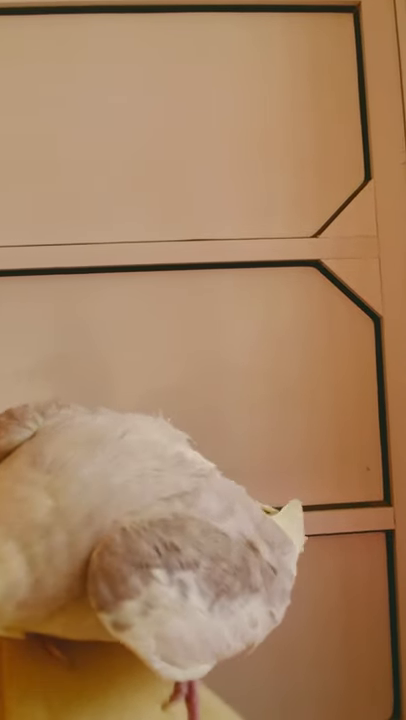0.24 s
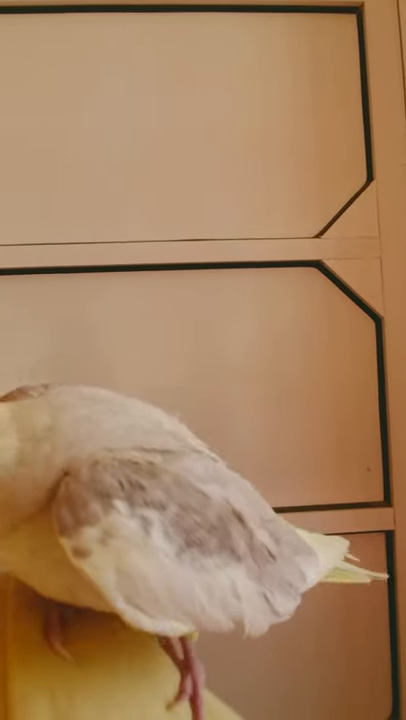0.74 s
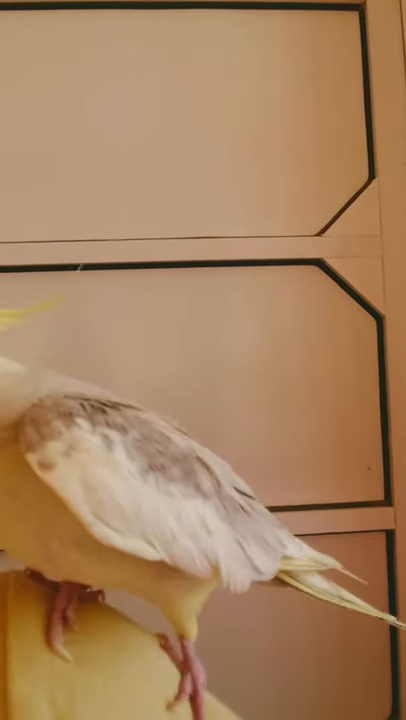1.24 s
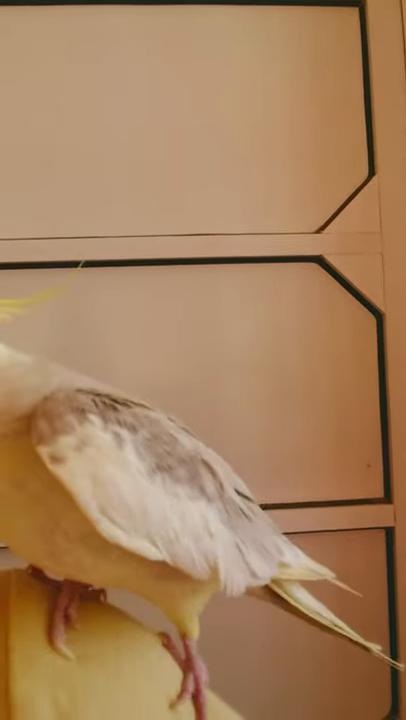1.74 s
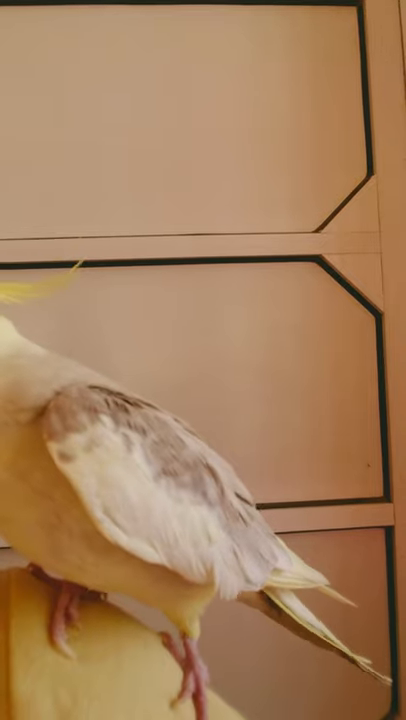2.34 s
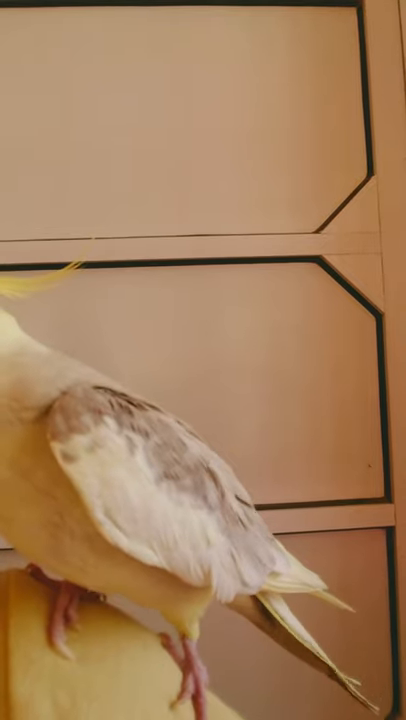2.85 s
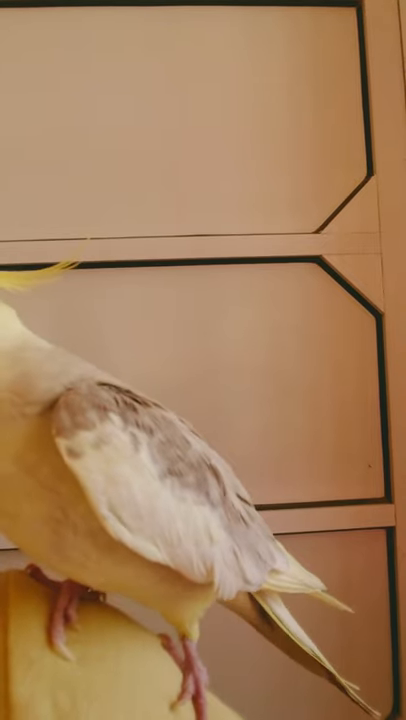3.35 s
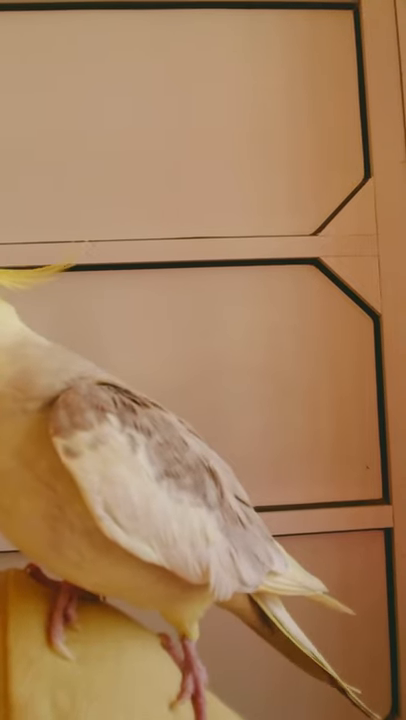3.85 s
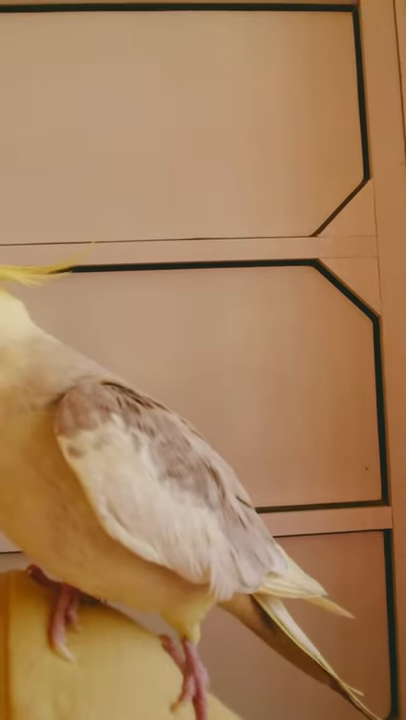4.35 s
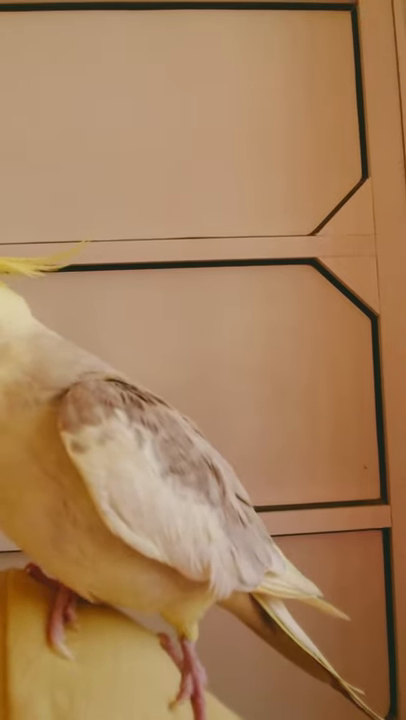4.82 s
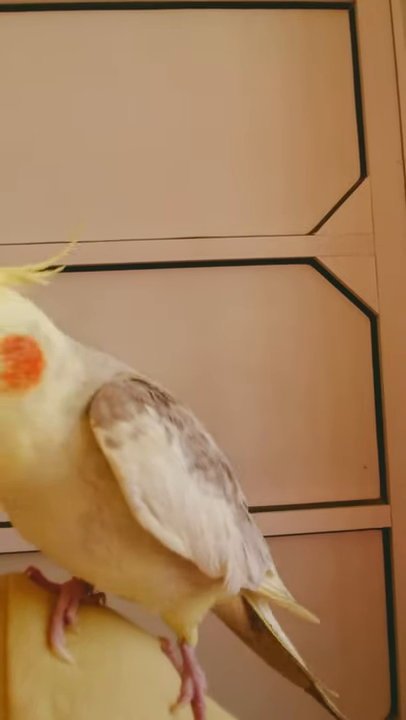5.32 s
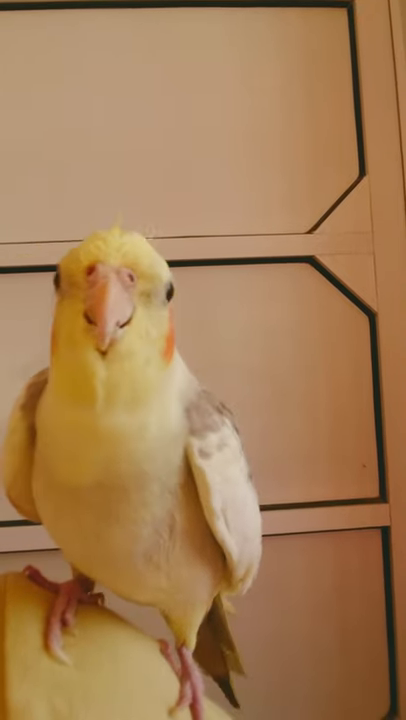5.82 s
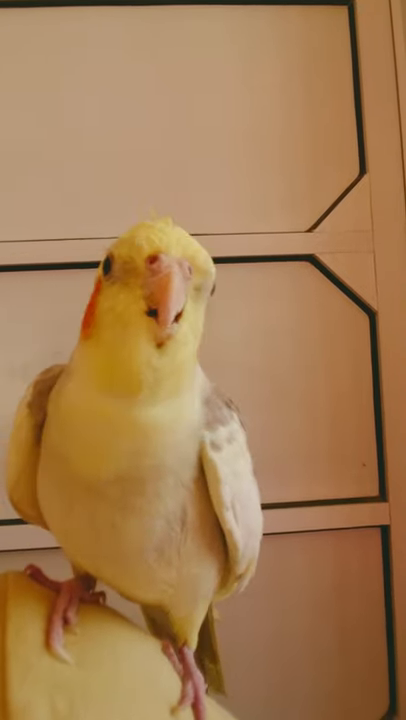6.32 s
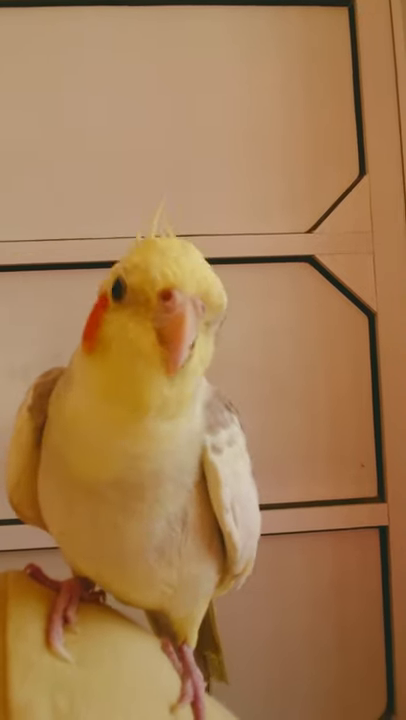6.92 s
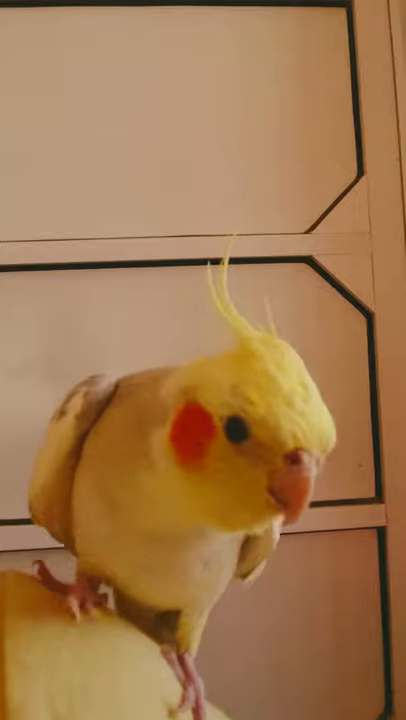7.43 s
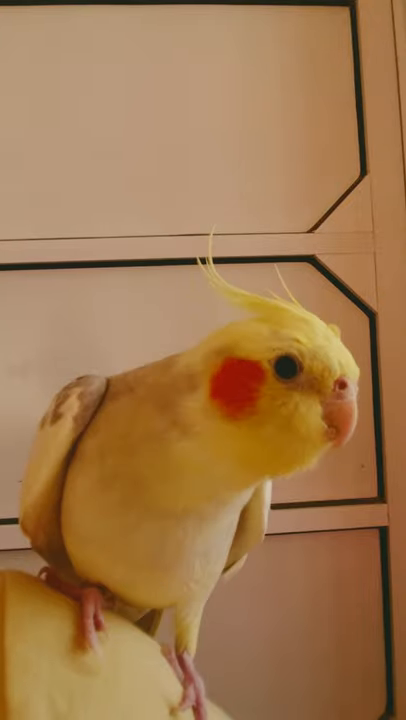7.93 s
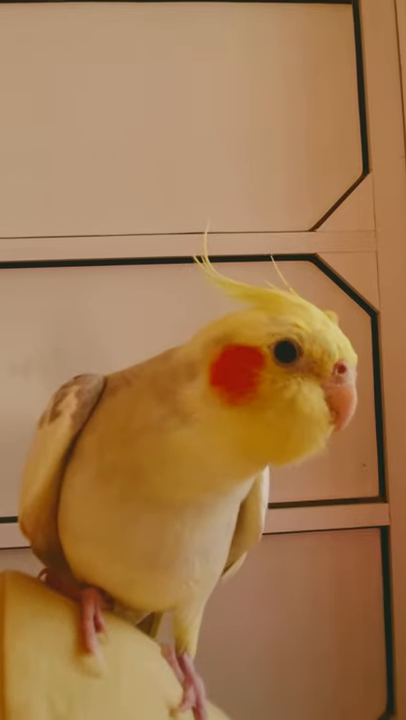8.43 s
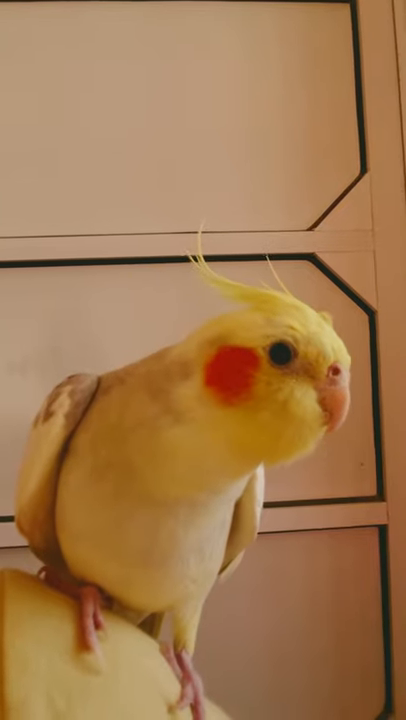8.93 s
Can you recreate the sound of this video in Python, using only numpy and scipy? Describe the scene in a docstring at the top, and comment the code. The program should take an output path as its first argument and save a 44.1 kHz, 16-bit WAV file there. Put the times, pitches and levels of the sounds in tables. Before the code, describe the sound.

Quiet room tone with low electrical hum, and one small pet bird close to a stereo phone microphone. A soft low note opens into quick, sharp, downward chirps about six per second. It pauses, repeats the low note, clicks faintly, then throws out varied whistles with rising slurs and a strained squawk. Three spaced two-part calls end it, high peep then soft croaking creak, with short reflections off the walls.

```python
"""Cockatiel close to a phone

A cockatiel sings close to a two-port phone microphone in a small quiet room: a low note, a run of quick
falling chirps, the low note again, warbled whistles and a squawk, then three two-part calls ending in a creak.
Its syrinx gives a near-pure tone with thin overtones and breaks into rasp when the pitch drops.
The walls answer each note with echoes and a diffuse tail; mains hum, a thin whine and room noise lie underneath.
"""
import sys
import numpy as np
from scipy import signal
from scipy.fft import rfft, irfft
from scipy.io import wavfile
from scipy.ndimage import map_coordinates

SR = 44100
rng = np.random.default_rng(int(sys.argv[2]) if len(sys.argv) > 2 else 0)


def file_out(sig):
    """Save sig as 16-bit WAV at sys.argv[1]."""
    # one column per channel
    cols = np.atleast_2d(sig).T
    # limit, then scale
    lim = np.clip(cols, -1, 1)
    pcm = np.round(lim * 32767).astype(np.int16)
    wavfile.write(sys.argv[1], SR, pcm)


N = 404397  # samples
TOP_HZ = 15850  # top of the phone's band


# overtones against the fundamental, as throat and beak pass them: freq_hz, level_db
OVERTONE_LEVELS = [(2500, -17.5), (3700, -17), (4600, -27.5), (5800, -27.5), (6800, -41), (8500, -38.5),
                   (9800, -48.5), (11500, -42.5), (13500, -45), (15500, -45)]


def syrinx(hz, db, strain_db, rough, jitter=0.016, tremor=0.0031, shimmer=0.083,
           rasp_db=-20, hiss_db=-53, strain_reach=0.42):
    """One note: a tone and its overtones; roughness shakes pitch and level and lets air through."""
    count = len(hz)
    hz = hz * (1 + jitter * rough * wander(count, 450) + tremor * wander(count, 260))
    phase = 2 * np.pi * np.cumsum(hz) / SR
    tone = np.sin(phase)
    for k in range(2, 12):
        # strain lifts the lowest overtones most
        strain_lift_db = strain_db / (k - 1) ** strain_reach
        overtone_db = colour(k * hz, OVERTONE_LEVELS) + strain_lift_db + 3.2 * wander(count, 80)
        overtone_db -= 5 * rough  # a rough tone loses its clear overtones
        tone += undb(overtone_db) * (k * hz < TOP_HZ) * np.sin(k * phase)
    rasp = unit(throat(rng.standard_normal(count), 3300))
    hiss = unit(breath_colour(rng.standard_normal(count)))
    voice = np.sqrt(2) * tone * (1 + shimmer * rough * wander(count, 370))
    voice += undb(rasp_db) * rough * rasp
    voice += undb(hiss_db) * (1 + 14 * rough) * hiss
    soft_edges = signal.windows.tukey(count, min(0.0042 * SR / count, 1))
    return voice * undb(db) * soft_edges


def breath_colour(noise):
    """Air noise takes half the overtones' slope in dB."""
    return shape(noise, lambda f: undb(colour(f, OVERTONE_LEVELS) / 2))


def throat(x, hz, q=1.6, low_hz=560, high_hz=2700):
    """A broad resonance inside the steep pass band of the windpipe."""
    windpipe = signal.butter(4, [low_hz, high_hz], "band", fs=SR, output="sos")
    return signal.sosfilt(windpipe, resonate(x, hz, q))


def creak(length, db, hz, rate, scatter_db=3, air_db=-27, air_s=.001):
    """Irregular slaps of the membranes ring the throat; each lets out a puff of air."""
    count = int(length * SR)
    gap, size = rng.standard_normal((64, 2)).T
    at = np.cumsum(np.r_[0, np.exp(.4 * gap[1:])] * SR / rate).astype(int)
    inside = at < count
    slap_gain = undb(scatter_db * size - 5 * at / count)
    pulses = np.zeros(count + 256)  # room to ring out
    pulses[at[inside]] = slap_gain[inside]
    puff_envelope = signal.lfilter([1], [1, -np.exp(-1 / (air_s * SR))], pulses)
    air = breath_colour(puff_envelope * rng.standard_normal(len(pulses)))
    return undb(db) * (unit(throat(pulses, hz)) + undb(air_db) * unit(air))


def song(chirp_db=1.0, whistle_db=5, slur_db=-6, squawk_db=-2, peep_db=7, downslur_db=-1):
    """All the notes; each kind beams its highest overtones more or less at the phone."""
    return (treble(chirps(), chirp_db) + treble(whistles(), whistle_db) + treble(slurs(), slur_db)
            + treble(squawk(), squawk_db) + treble(peeps(), peep_db) + treble(downslurs(), downslur_db))


# the run of chirps: start_s, length_s, pitch_hz, sag_hz, crack_db (closing crack, before break_db)
CHIRP_RUN = [(1.106, 0.061, 2763, 112.5, -49.5), (1.265, 0.066, 3114, 869, -46.5),
             (1.424, 0.06, 3077, 707, -45.5), (1.576, 0.067, 3179, 752, -49.5),
             (1.748, 0.07, 3150, 911, -43), (1.926, 0.079, 3005, 456, -47),
             (2.102, 0.073, 3135, 934, -44.5), (2.28, 0.07, 3016, 626, -44.5),
             (2.458, 0.077, 3054, 609.3, -47), (2.631, 0.067, 3096, 737.4, -43.5),
             (2.804, 0.074, 3026, 500, -42.5), (2.985, 0.072, 3096, 728, -45),
             (3.168, 0.075, 3132, 717, -42.5), (3.359, 0.075, 3127, 807, -42),
             (3.538, 0.083, 2916, 315.3, -39), (3.725, 0.086, 2915, 284, -45),
             (3.936, 0.079, 2959, 484, -45)]
# air pressure over one chirp: share_of_length, level_db
CHIRP_PRESSURE = [(0, -7.5), (.05, 6.5), (.3, 9.5), (.6, 5.5), (.79, -0.5), (.93, -13), (1, -17.5)]
# the run starts softer and soon reaches full voice
CHIRP_DB, WARM_UP_DB, WARM_UP_S = -22.5, -4.5, .3


def chirps(end_hz=1400, scoop_hz=200, scoop_s=.008, break_at=.78, break_db=2.5, break_hz=1400,
           strain_db=0, strain_fade_db=-4, end_rough=0.82):
    """Each chirp scoops up, sags, then plunges as the tension goes and cracks into a low rasp."""
    out = np.zeros(N)
    for s, length, top_hz, sag_hz, crack_db in CHIRP_RUN:
        t, u = note_time(length)
        scoop = scoop_hz * np.exp(-t / scoop_s)
        plunge = (top_hz - sag_hz - end_hz) * u ** 6
        hz = top_hz - scoop - sag_hz * u - plunge
        warm_up_db = WARM_UP_DB * np.exp((CHIRP_RUN[0][0] - s) / WARM_UP_S)
        db = CHIRP_DB + warm_up_db + np.interp(u, *np.transpose(CHIRP_PRESSURE))
        add(out, syrinx(hz, db, strain_db + strain_fade_db * u, end_rough * u ** 4), s)
        crack = creak(0.19 * length, crack_db + break_db, break_hz, 700)
        add(out, crack, s + break_at * length)
    return out


# held whistles: start_s, length_s, pitch_hz, swing_hz, crest (share of length), final_drop_hz,
# level_db, swell_db, strain_db, beak_shut (0-1)
HELD_WHISTLES = [(0.955, .097, 1300, 32, .72, 81, -34.5, 0, -1, 0.43),
                 (4.165, .107, 1298, 18, .9, 79, -29.5, 1.3, 5.5, 0.95),
                 (5.212, .074, 2020, 140, 0.55, 730, -28, 6.5, -1, 0.16),
                 (5.565, .078, 1347, 62, .68, 70, -33, 3, -4, 0),
                 (5.936, .067, 2188, 72, .53, 20, -20.5, 2, 2, 0.11),
                 (6.075, .091, 1621, 75, .52, 470, -24, 3, -0.5, 0)]
# muffling of the overtones by a fully shut beak: freq_hz, level_db
BEAK_MUFFLE = [(2700, 0), (3800, -15), (5200, -9.5), (12000, -18)]


def whistles(entry_hz=150, entry_s=0.0033, release_db=-11, rough=0.11, edge_rough=0.41):
    """A whistle settles from above, swells once in pitch, level and strain, and drops; a shut beak muffles."""
    out = np.zeros(N)
    for s, length, pitch_hz, swing_hz, crest, drop_hz, db, swell_db, strain_db, shut in HELD_WHISTLES:
        t, u = note_time(length)
        effort = np.cos(2 * np.pi * (u - crest))
        entry, release = np.exp(-t / entry_s), u ** 12
        hz = pitch_hz + swing_hz * effort + entry_hz * entry - drop_hz * release
        level_db = db + swell_db * effort + release_db * release
        roughness = rough + edge_rough * (entry + release)
        note = syrinx(hz, level_db, strain_db + swell_db * effort, roughness)
        add(out, shape(note, lambda f: undb(shut * colour(f, BEAK_MUFFLE))), s)
    return out


# two warbled upward slurs, one pitch curve each: time_s, pitch_hz
SLUR_CURVES = [
    [(5.298, 2300), (5.306, 2324), (5.318, 2728), (5.352, 2973), (5.36, 2980), (5.368, 3153), (5.384, 3341),
     (5.392, 3262)],
    [(5.696, 2126), (5.7, 2080), (5.708, 2629), (5.724, 2653), (5.732, 2680), (5.766, 2795), (5.774, 2890),
     (5.798, 3004), (5.816, 2877)],
]
# level of each slur: start_db, end_db
SLUR_RAMPS = [(-26, -14.5), (-14, -23.5)]


def slurs(onset_db=-10, onset_s=.004, strain_db=4, rough=.22, warble_hz=38, crest_s=0.028,
          warble_db=4.0, warble_depth=0.011):
    """Slightly rough whistles that climb in steps, throbbing in pitch and level."""
    out = np.zeros(N)
    for curve, (start_db, end_db) in zip(SLUR_CURVES, SLUR_RAMPS):
        s, hz = np.transpose(curve)
        t, u = note_time(s[-1] - s[0])
        warble = np.cos(2 * np.pi * warble_hz * (t - crest_s))
        db = start_db + (end_db - start_db) * u + onset_db * np.exp(-t / onset_s) + warble_db * warble
        warbled_hz = np.interp(s[0] + t, s, hz) * (1 + warble_depth * warble)
        add(out, syrinx(warbled_hz, db, strain_db, rough), s[0])
    return out


# the squawk climbs an octave into a clear whistle: time_s, pitch_hz, level_db,
# strain_db (lift of the low overtones)
SQUAWK_CURVE = [(6.294, 1322, -33, 10), (6.328, 1510, -26, 16.5), (6.354, 1798, -21.5, 28),
                (6.386, 2152, -16.5, 17), (6.397, 2790, -13.5, -2), (6.41, 3053, -12, 4),
                (6.448, 2912, -10.5, -2), (6.473, 2628, -18.5, 4.5), (6.49, 1475, -38, 9.5)]
# a fast flutter partway up the squawk
TRILL_AT_S, TRILL_WIDTH_S, TRILL_HZ, TRILL_DEPTH = 6.369, .023, 85, .07


def squawk(pulse_db=4.0, rough=0.038, trill_rough=0.067, end_rough=1.0):
    """A strained rise; the flutter shakes its pitch and level until it breaks through into a clear tone."""
    out = np.zeros(N)
    s, *columns = np.transpose(SQUAWK_CURVE)
    t, u = note_time(s[-1] - s[0])
    t = t + s[0]
    hz, db, strain_db = (np.interp(t, s, c) for c in columns)
    shaking = np.exp(-((t - TRILL_AT_S) / TRILL_WIDTH_S) ** 2)
    trill = shaking * np.cos(2 * np.pi * TRILL_HZ * (t - TRILL_AT_S))
    roughness = rough + trill_rough * shaking + end_rough * u ** 20
    trilled_hz = hz * (1 + TRILL_DEPTH * trill)
    add(out, syrinx(trilled_hz, db + pulse_db * trill, strain_db, roughness, strain_reach=0.535), s[0])
    return out


# rising peeps, first part of the calls: start_s, leap_after_s, length_s, top_pitch_hz, level_db
RISING_PEEPS = [(7.321, .022, 0.067, 2655, -19.5), (7.691, .025, .066, 2608, -15),
                (8.083, .019, .069, 2646, -15)]


def peeps(low_hz=1480, leap_s=0.0038, sag_hz=110, low_db=-14, onset_db=-14, onset_s=.01, release_db=-10,
          strain_db=12.5, relax_db=-22, rough=0.095, open_db=-42, close_db=-42):
    """A peep starts as a low creaky rasp, leaps to a clear high tone, sags and shuts with a short crack."""
    out = np.zeros(N)
    for s, leap_after, length, top_hz, db in RISING_PEEPS:
        t, u = note_time(length)
        low = 1 / (1 + np.exp((t - leap_after) / leap_s))  # 1 before the leap, 0 after
        hz = top_hz + (low_hz - top_hz) * low - sag_hz * u ** 5
        level_db = db + low_db * low + onset_db * np.exp(-t / onset_s) + release_db * u ** 10
        tension_db = (1 - low) * strain_db + relax_db * u ** 2
        add(out, syrinx(hz, level_db, tension_db, np.maximum(low, rough)), s)
        add(out, creak(leap_after, open_db, 1620, 430), s)
        add(out, creak(0.0068, close_db, 1600, 680), s + .93 * length)
    return out


# soft falling notes: start_s, length_s, pitch_hz, level_db, roughness (0-1)
FALLING_NOTES = [(5.177, 0.037, 2343, -45, .9), (7.453, 0.046, 2254, -34.5, 0),
                 (7.832, 0.042, 2200, -30, 0), (8.224, 0.036, 2230, -28, 0.1)]


def downslurs(fall_hz_per_s=5500, drop_hz=130, strain_db=9, relax_db=-16, end_rough=.6):
    """Soft notes that slide down, lose their overtones and fray."""
    out = np.zeros(N)
    for s, length, pitch_hz, db, rough in FALLING_NOTES:
        t, u = note_time(length)
        fray = u ** 6
        hz = pitch_hz - fall_hz_per_s * t - drop_hz * fray
        roughness = np.minimum(rough + end_rough * fray, 1)
        add(out, syrinx(hz, db - 5 * fray, strain_db + relax_db * u, roughness), s)
    return out


# creaks of the slack syrinx: start_s, length_s, level_db, centre_hz, pulses_per_s
SLACK_CREAKS = [(3.809, 0.029, -41.5, 1483, 690), (5.184, 0.028, -43.5, 1520, 670),
                (5.277, .014, -41, 1490, 460), (5.633, 0.0084, -42.5, 1211, 290),
                (6.077, 0.0091, -42, 1246, 400), (6.15, 0.017, -41.5, 1464, 500),
                (6.473, 0.017, -43.5, 2010, 680), (7.482, 0.046, -45.5, 1710, 200),
                (7.862, 0.043, -39, 1690, 420), (8.25, 0.07, -36.5, 1620, 540)]
# single clicks of throat and beak: start_s, peak_db, centre_hz
THROAT_CLICKS = [(1.724, -50, 3810), (1.872, -52.5, 5070), (4.722, -54, 4470), (4.81, -61, 2300),
                 (5.236, -45, 8900), (5.387, -27, 4430), (5.756, -29.5, 1750), (5.94, -33.5, 1410),
                 (7.313, -38.5, 1687), (7.39, -39, 1690), (7.683, -32.5, 1540), (8.076, -32, 1690)]


def throat_noises(click_s=.0006):
    """Creaks around the notes, and small dry clicks: noise bursts through three resonances in a row."""
    out = np.zeros(N)
    for s, length, db, hz, rate in SLACK_CREAKS:
        add(out, creak(length, db, hz, rate), s)
    t = np.arange(512) / SR
    for s, db, hz in THROAT_CLICKS:
        click = rng.standard_normal(len(t)) * np.exp(-t / click_s)
        for _ in range(3):
            click = resonate(click, hz, 1.7)
        add(out, undb(db) * click / np.abs(click).max(), s)
    return out


# the diffuse tail off the walls: centre_hz, t60_s, level_db
WALL_TAIL = [(694.6, 0.16, -15.5), (1380, 0.55, -11), (2230, 0.56, -16.5), (3130, 0.56, -13.5),
             (4002, 0.36, -18), (5600, 0.38, -17), (10990, 0.64, -17)]
# clear echoes from near surfaces: delay_ms, left_db, right_db
NEAR_ECHOES = [(9.154, -13.5, -23), (14.87, -17, -25), (20.3, -20, -28.5), (27.4, -30.5, -24),
               (34.76, -31.5, -32), (50.3, -27.5, -25.5), (65, -31, -36), (78, -31.5, -38.5),
               (87.4, -26, -44.5)]


def room(x, build_s=0.012):
    """A few clear echoes from near surfaces, and a diffuse tail whose decay time varies with frequency."""
    t = np.arange(int(SR)) / SR
    response = np.zeros((2, len(t)))
    noise = rng.standard_normal(response.shape)
    centres = [row[0] for row in WALL_TAIL]
    # each row of the identity picks out one band, crossfading into its neighbours
    for share, (hz, t60, db) in zip(np.eye(len(WALL_TAIL)), WALL_TAIL):
        decay = np.exp(-np.log(1000) * t / t60) * (1 - np.exp(-t / build_s))
        band = shape(noise, lambda f: colour(f, np.c_[centres, share]))
        response += undb(db) * band * decay / np.linalg.norm(decay)
    for ms, left_db, right_db in NEAR_ECHOES:
        response[:, int(ms * SR / 1000)] += undb([left_db, right_db])
    return signal.fftconvolve(x[None], response, axes=1)[:, :N]


# the bird's head: time_s, left_lead_ms (left port hears it first), facing (turned to the phone, 0-1)
HEAD_TURNS = [(1, 0.054, 0.11), (4.3, 0.083, 0.08), (5.2, 0.094, 0), (5.7, .2, 1), (6.45, 0.16, 1),
              (7.35, .1, 0.67), (8.25, .13, 0.57)]
# left minus right, head turned away: freq_hz, difference_db
PAN_AWAY = [(1300, -4), (2400, 0.5), (2900, -2), (4400, -5.5), (6000, -8.5), (8000, -20), (13000, -8.5)]
# left minus right, head facing the phone: freq_hz, difference_db
PAN_FACING = [(1350, -1), (1700, 2.5), (2200, -2), (2600, 10.5), (2950, 3), (3300, -2.5), (6000, -0.5),
              (8000, -17.5), (13000, 5)]
# treble dip of both ports: freq_hz, level_db
PORT_TREBLE = [(6000, -0.5), (7200, 0), (9000, -4), (9900, -9), (11200, -2), (13000, -2.5)]


def at_the_ports(bird):
    """The right port hears the bird slightly late; turning the head changes each port's tone."""
    s, *columns = np.transpose(HEAD_TURNS)
    lead_ms, facing = (np.interp(np.arange(N) / SR, s, c) for c in columns)
    facing = np.clip(facing, 0, 1)
    late = map_coordinates(bird, [np.arange(N) - lead_ms * SR / 1000], order=3)
    pair = np.array([bird, late]) + room(bird)
    heard = pan(pair * (1 - facing), PAN_AWAY) + pan(pair * facing, PAN_FACING)
    return shape(heard, lambda f: undb(colour(f, PORT_TREBLE)))


def pan(pair, points):
    """Share each frequency between left and right at constant power."""
    def gains(f):
        g = undb(np.array([[.5], [-.5]]) * colour(f, points))
        return g / np.sqrt(np.mean(g ** 2, axis=0))
    return shape(pair, gains)


# mains hum: freq_hz, level_db (before hum_db and the port balance)
MAINS_HUM = [(120, -60.5), (240, -59), (360, -74.5), (480, -73.5)]
# spectrum of the room noise, relative: freq_hz, density_db
ROOM_NOISE = [(15, -35.5), (25, -9.5), (48, -10), (119, 2.5), (183, -9.5), (240, -7.5), (297, -13.5),
              (421, -20), (482, -13.5), (598, -19), (1140, -32.5), (3720, -39.5), (4150, -37.5),
              (12200, -48), (15500, -74)]
ROOM_NOISE_DB = -58  # the part alike at both ports, before the port balance


def background(hum_db=-1, whine_hz=4150, whine_db=-84):
    """Wavering mains hum, a thin whine and soft room noise whose bass is nearly alike at both ports."""
    t = np.arange(N) / SR
    hum = np.zeros(N)
    for hz, db in MAINS_HUM:
        gain = undb(db + hum_db + 0.72 * wander(N, 5)) * np.sqrt(2)
        hum += gain * np.sin(2 * np.pi * hz * t + .2 * wander(N, 4.6))
    mid, side = shape(rng.standard_normal((2, N)), lambda f: undb(colour(f, ROOM_NOISE)))
    side = shape(side, lambda f: colour(f, [(150, .15), (600, 0.6), (2000, 0.83)]))
    air = undb(ROOM_NOISE_DB) * (mid + side * np.array([[1], [-1]])) / mid.std()
    whine = undb(whine_db) * unit(resonate(rng.standard_normal((2, N)), whine_hz, 35))
    port_balance = undb(np.array([[-.9], [.9]]))  # right port a little louder
    return (hum + air + whine) * port_balance


def undb(db):
    """Decibels to gain."""
    return 10 ** (np.asarray(db) / 20)


def unit(x):
    """Scale to rms 1."""
    return x / np.sqrt(np.mean(x ** 2) + 1e-18)


def colour(hz, points):
    """Read a table of (Hz, value) on a log-frequency axis."""
    f, value = np.transpose(points)
    return np.interp(np.log(np.maximum(hz, 1)), np.log(f), value)


def shape(x, gain):
    """Filter by a gain that is a function of frequency."""
    return irfft(rfft(x) * gain(np.fft.rfftfreq(x.shape[-1], 1 / SR)), x.shape[-1])


def treble(x, db):
    """Lift or soften the highest overtones, by db from 15 kHz up."""
    return shape(x, lambda f: undb(db * colour(f, [(6500, 0), (15000, 1)])))


def wander(count, hz):
    """Smooth random motion of spread about 1, up to about hz."""
    noise = rng.standard_normal(count + 4096)
    return unit(shape(noise, lambda f: 1 / (1 + (f / hz) ** 4)))[:count]


def resonate(x, hz, q):
    """One resonance."""
    return signal.lfilter(*signal.iirpeak(hz, max(q, hz / (SR / 3)), fs=SR), x)


def note_time(length):
    """Seconds and share of the length through one note."""
    t = np.arange(int(length * SR)) / SR
    return t, t / length


def add(out, x, s):
    """Mix x in at time s."""
    i = max(int(s * SR), 0)
    out[i:i + len(x)] += x[:len(out) - i]


def scene():
    """The bird and its room at the two ports, over the background."""
    return at_the_ports(song() + throat_noises()) + background()


def record(dry, low_cut_hz=44):
    """The phone cuts the deep bass and the top."""
    dry = signal.sosfilt(signal.butter(3, low_cut_hz, "high", fs=SR, output="sos"), dry)
    return signal.sosfilt(signal.ellip(10, .2, 70, TOP_HZ, fs=SR, output="sos"), dry)


dry = scene()
out = record(dry)
file_out(out)
```